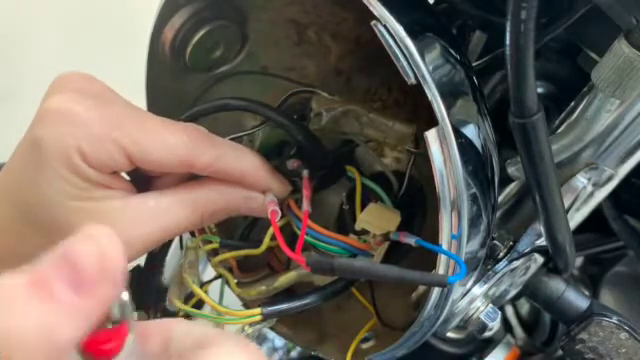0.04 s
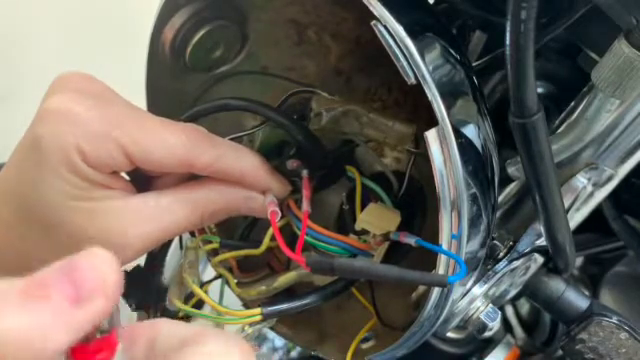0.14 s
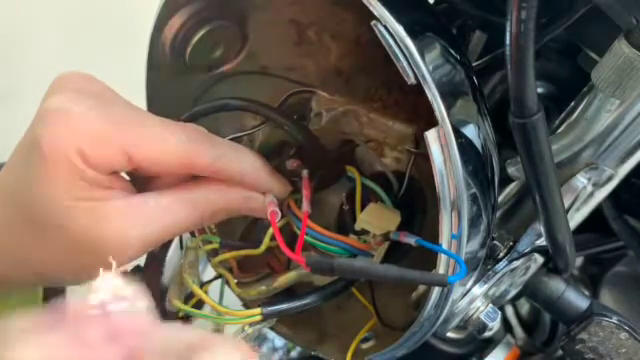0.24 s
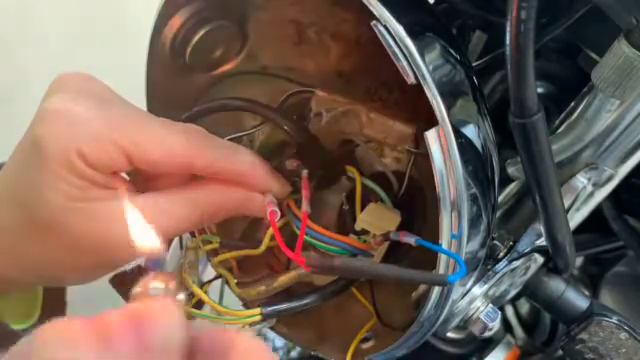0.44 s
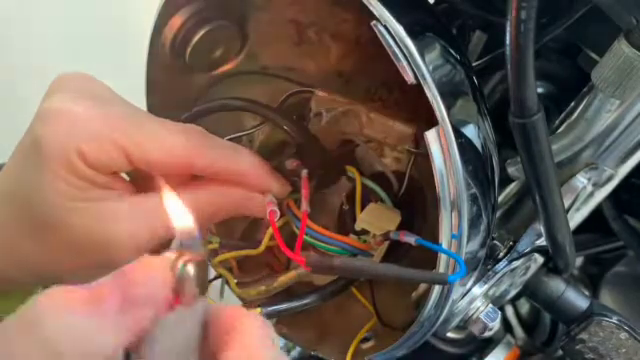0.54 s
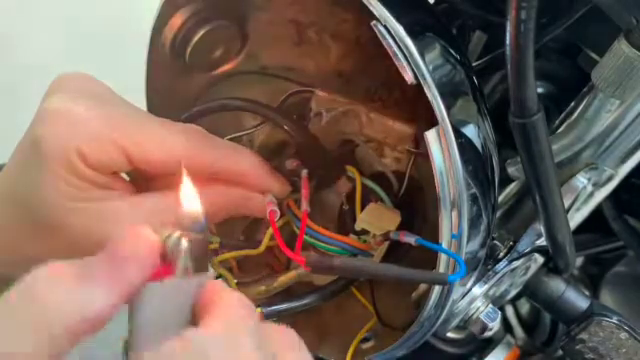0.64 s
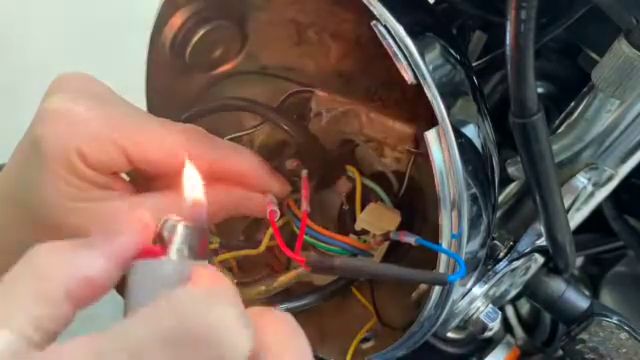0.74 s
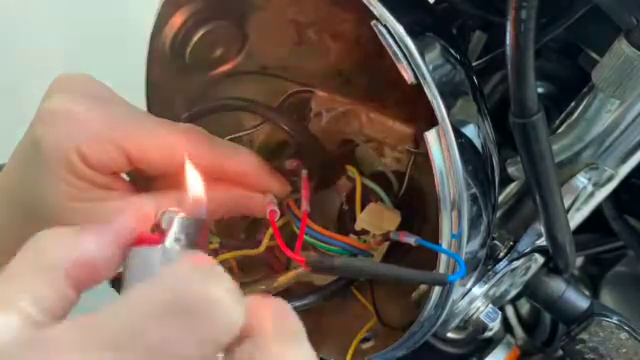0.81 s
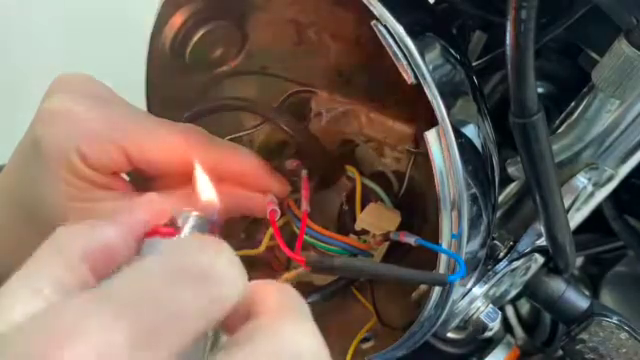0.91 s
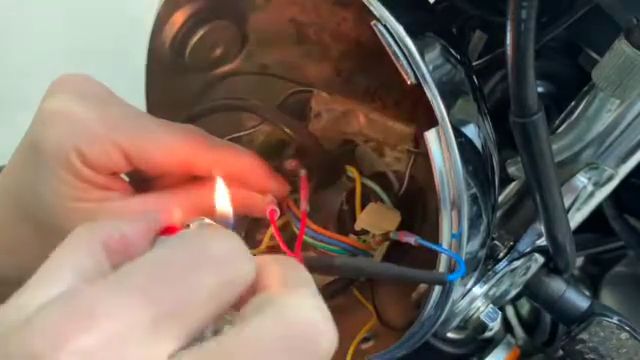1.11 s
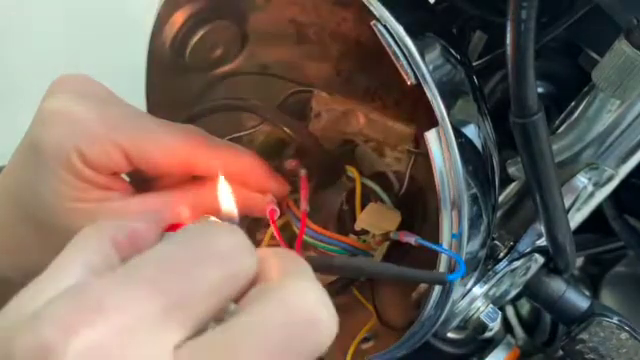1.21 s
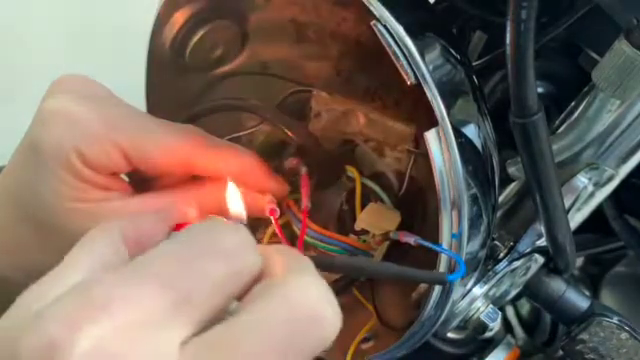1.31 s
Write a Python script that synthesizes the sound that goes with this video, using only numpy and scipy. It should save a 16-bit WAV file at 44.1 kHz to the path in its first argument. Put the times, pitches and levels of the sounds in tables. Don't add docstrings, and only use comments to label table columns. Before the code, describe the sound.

Lighter flint wheel rasps and slips early in a crisp metallic crack with a short hissy room tail; afterwards soft rustling, low rumble and hum, and one very faint tick near the end, heard close up.

```python
import sys
import numpy as np
from scipy import signal
from scipy.fft import rfft, irfft
from scipy.io import wavfile
from scipy.ndimage import uniform_filter1d

SR = 44100
rng = np.random.default_rng(int(sys.argv[2]) if len(sys.argv) > 2 else 0)


def to_linear_factor(level_db):
    exponent = np.asarray(level_db, float) / 20
    return 10 ** exponent


def inscribe(sig):
    pcm = np.round(np.clip(np.atleast_2d(sig).T, -1, 1) * 32767)
    wavfile.write(sys.argv[1], SR, pcm.astype(np.int16))


N = 59535

# start in [s], level in [dB], snap pitch in [Hz], snap T60 in [s].
TEETH = [
    (.2238, -11, 13500, .003),
    (.2249, -2.5, 5200, .004),
    (.2257, -5.5, 6600, .006),
    (.2269, -11, 4600, .003),
    (.2275, -11, 6100, .006),
    (.2297, -14, 7200, .01),
    (.2322, -18, 6900, .03),
    (.2348, -13, 6800, .011),
    (.2377, -17, 6600, .012),
]
# start in [s], level in [dB].
TICKS = [
    (1.2612, -46),
]
STRIKE_S = TEETH[1][0]


def curve(table, at, col=1):
    rows = np.array(table)
    return np.interp(at, rows[:, 0], rows[:, col])


def colour(x, table, col=1):
    hz = np.arange(len(x) // 2 + 1) * SR / len(x) + 1
    rows = np.array(table)
    gain_db = np.interp(np.log(hz), np.log(rows[:, 0]), rows[:, col], -90)
    return irfft(rfft(x) * to_linear_factor(gain_db), len(x))


def level(x, db):
    return x * to_linear_factor(db) / np.sqrt(np.mean(x ** 2))


def coloured_noise(table, db):
    return level(colour(rng.standard_normal(N), table), db)


def walk(rate_hz):
    k = int(SR / rate_hz)
    smooth = uniform_filter1d(rng.standard_normal(N), k)
    return level(uniform_filter1d(smooth, k), 0)


def ring(start, hz, db, t60, phase=0):
    contact_s = .00015
    out = np.zeros(N)
    at = int(start * SR) + 1
    t = np.arange(at, min(N, at + int(2 * t60 * SR) + 9)) / SR - start
    onset = 1 - np.exp(-t / contact_s)
    out[at:at + len(t)] = to_linear_factor(db - 60 * t / t60) * np.sin(2 * np.pi * hz * t + phase) * onset
    return out


def burst(start, db, t60):
    return ring(start, 0, db, t60, np.pi / 2)


def teeth():
    # frequency in [Hz], level in [dB], T60 in [s].
    hood = [(2400, -45, 0.0031), (3700, -42, .008), (4380, -14, 0.0027), (4800, -17, 0.0029),
            (5820, -1, .008), (6050, -12, .012), (7210, -9.5, 0.028), (7540, -23, 0.06),
            (9300, -21.5, 0.015), (11000, -18.5, 0.01), (13500, -27, .008), (14870, -22, .006)]
    # frequency in [Hz], level in [dB].
    crack_colour = [(300, -26), (1500, -26.5), (3000, -12.5), (4500, -10), (7000, 3.5), (9000, -5),
                    (13000, -4.5), (16000, -12.5)]
    hood_db, crack_db, crack_t60_s = -17, -13, 0.0099
    out = np.zeros(N)
    noise = coloured_noise(crack_colour, 0)
    for start, db, snap_hz, snap_t60 in TEETH:
        out += ring(start, snap_hz, db, snap_t60)
        out += noise * burst(start, db + crack_db, crack_t60_s)
        for hz, mode_db, t60 in hood:
            detune, uneven = rng.standard_normal(2)
            out += ring(start, hz * (1 + .015 * detune), db + mode_db + hood_db + 2.5 * uneven, t60)
    return out


def body():
    # frequency in [Hz], level in [dB], T60 in [s].
    body_modes = [(410.4, -41.5, 0.016), (650, -33.5, .025), (1126, -41.5, 0.056), (1645, -35.5, .02),
                  (2100, -46.5, 0.011)]
    return sum(ring(STRIKE_S, *mode) for mode in body_modes)


def drag():
    # time in [s], level in [dB].
    swell = [
        (.16, -81.5),
        (.18, -54.5),
        (.19, -58.5),
        (.203, -53.5),
        (.214, -44),
        (.222, -31.5),
        (.226, -35.5),
        (.24, -34.5),
        (.25, -64),
    ]
    # frequency in [Hz], level in [dB].
    drag_colour = [(600, -41), (1200, -10), (2400, -6), (4000, -2), (6000, -2), (7500, -0.5), (9500, -7.5),
                   (11000, -21.5)]
    grit_per_s, grit_spread_db = 9000, 2.5
    t = np.arange(N) / SR
    chance, side, size = rng.random((N, 3)).T
    clicks = (chance < grit_per_s / SR) * np.sign(side - .5)
    grit = clicks * to_linear_factor(-grit_spread_db * np.log(size))
    scrape = level(colour(grit, drag_colour + [(16000, -36.5)]), 0)
    top = level(colour(grit, [(8500, -27.5), (11500, 1.5), (16000, -8.5)]), -3)
    fast = np.interp(t, (.205, .222), [0, 1])
    return (scrape + fast * top) * to_linear_factor(curve(swell, t)) * (t < swell[-1][0])


def room():
    # frequency in [Hz], tail level in [dB], T60 in [s].
    room_tail = [(500, -29, 0.43), (1500, -23.5, .55), (2670, -22, 0.63), (3516, -9, 0.57),
                 (5010, -10, .52), (7070, 0, 0.43), (8100, -11, 0.34), (16040, -13.5, 0.24)]
    delay_s, build_s = 0.0013, .008
    third, sixth = 2 ** (1 / 3), 2 ** (1 / 6)
    t = np.arange(N) / SR
    noise = coloured_noise(room_tail, -25)
    tail = np.zeros(N)
    for hz in 400 * 2 ** np.arange(0, 17 / 3, 1 / 3):
        band_shape = [(hz / third, -40), (hz / sixth, -6), (hz, 0), (hz * sixth, -6), (hz * third, -40), (SR, -90)]
        tail += colour(noise, band_shape) * to_linear_factor(-60 * t / curve(room_tail, hz, col=2))
    tail *= 1 - np.exp(-np.maximum(t - delay_s, 0) / build_s)
    hits = [(STRIKE_S, 0), (TICKS[0][0], -46)]
    return sum(to_linear_factor(db) * np.pad(tail, (int(start * SR), 0))[:N] for start, db in hits)


def bowl():
    return ring(STRIKE_S, hz=1434, db=-51, t60=0.59)


def ticks():
    # frequency in [Hz], level in [dB], T60 in [s].
    tick_modes = [(1600, -1, .016), (2500, 2, .009), (3200, -2, .008), (4480, -2, .022), (5330, -7, .045),
                  (7800, -13, .015)]
    noise = coloured_noise([(700, -27), (1500, -11), (6000, -9), (10000, -17), (16000, -25)], 0)
    out = np.zeros(N)
    for start, db in TICKS:
        out += noise * burst(start, db - 11, .025)
        out += sum(ring(start, hz, db + mode_db, t60) for hz, mode_db, t60 in tick_modes)
    return out


def rustle():
    # time in [s], level in [dB].
    swells = [(0, -64.5), (.06, -68.5), (.11, -72.5), (.5, -66.5), (.66, -63.5), (.8, -61), (.86, -63.5),
              (.89, -67), (1.0, -63.5), (1.06, -65.5), (1.14, -64.5), (1.19, -65.5), (1.24, -63.5),
              (1.3, -68.5), (1.35, -70)]
    # frequency in [Hz], level in [dB].
    rustle_colour = [(400, -9.5), (1000, 0.5), (1800, 3), (2800, -1.5), (4500, -3.5), (8000, -6),
                     (11000, -18), (16000, -24)]
    rub = coloured_noise(rustle_colour, 0)
    patches = np.zeros(N)
    for hz in 500 * 2 ** np.arange(0, 5.1, .5):
        patch = colour(rub, [(hz / 2, -40), (hz, 0), (2 * hz, -40), (SR, -90)])
        patches += patch * to_linear_factor(1.8 * walk(25))
    return level(patches, 0) * to_linear_factor(curve(swells, np.arange(N) / SR))


def hum():
    # frequency in [Hz], rms level in [dB].
    hum_lines = [
        (80.7, -56),
        (242.2, -74.5),
    ]
    t = np.arange(N) / SR
    return sum(np.sqrt(2) * to_linear_factor(db + 4.6 * walk(3.1)) * np.sin(2 * np.pi * hz * t) for hz, db in hum_lines)


def rumble():
    # frequency in [Hz], level in [dB].
    rumble_colour = [(12, -32), (20, 0), (38, 2), (54, -5.5), (86, -4.5), (99, -4.5), (113, -13),
                     (140, -27), (180, -63), (310, -120)]
    steady = coloured_noise(rumble_colour + [(200, -51.5)], -46.5)
    return steady * to_linear_factor(1.3 * walk(4) + 1.5 * walk(25))


def hiss():
    # frequency in [Hz], level in [dB].
    shop_colour = [(76, -38), (130, -5), (258, -14.5), (363, -15.5), (881, -29), (1320, -31.5), (1490, -45),
                   (2560, -34.5), (16000, -48)]
    return coloured_noise([(90, -30)] + shop_colour, -59.5) * to_linear_factor(0.78 * walk(7.9))


def scene():
    near = teeth() + body() + drag() + ticks()
    surroundings = room() + bowl()
    workshop = rumble() + hum() + hiss() + rustle()
    return (near + surroundings + workshop)[None]


def top_cut(x):
    return signal.sosfilt(signal.butter(12, 16400, fs=SR, output="sos"), x)


def record(dry):
    low_pass = signal.ellip(8, .2, 70, 15800, fs=SR, output="sos")
    mix = signal.sosfilt(low_pass, dry)
    return top_cut(mix)


dry = scene()
out = record(dry)
inscribe(out)
```